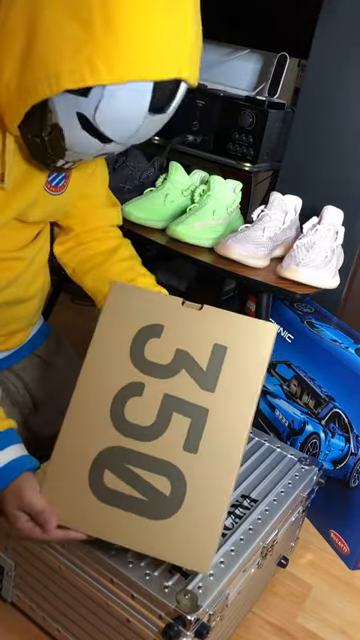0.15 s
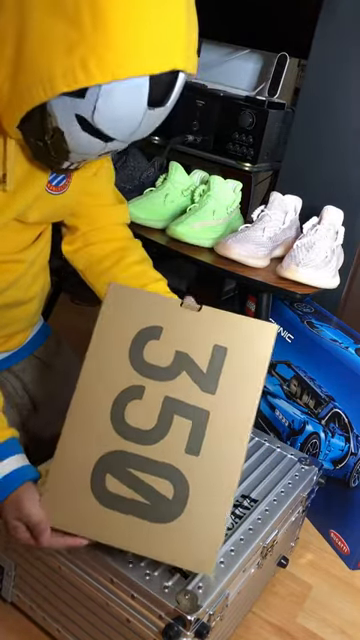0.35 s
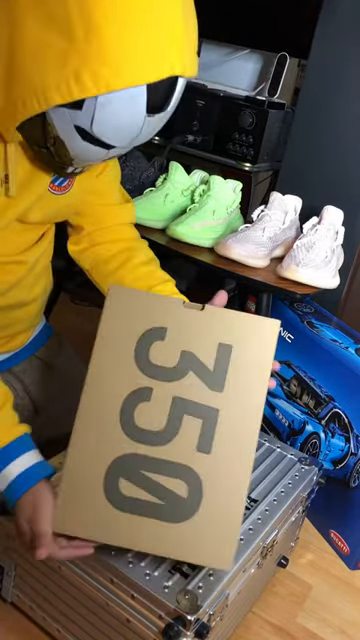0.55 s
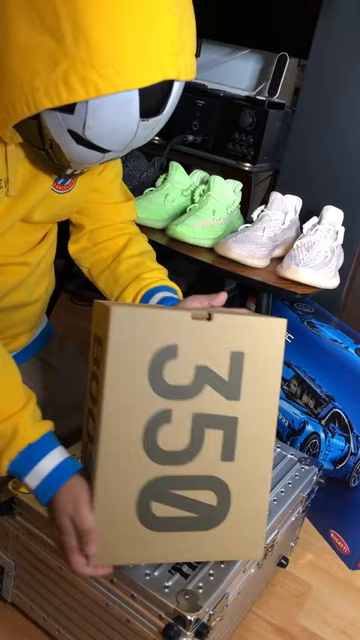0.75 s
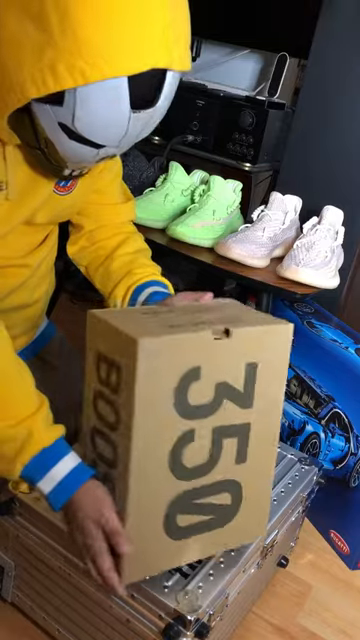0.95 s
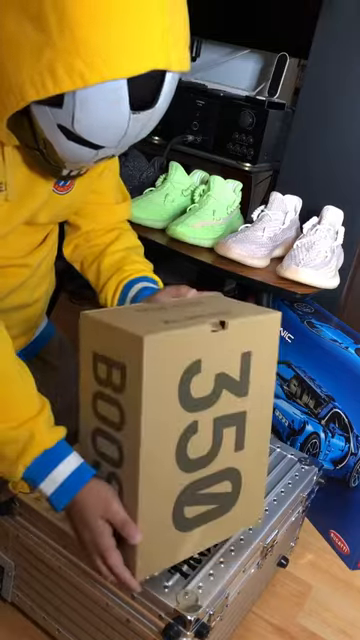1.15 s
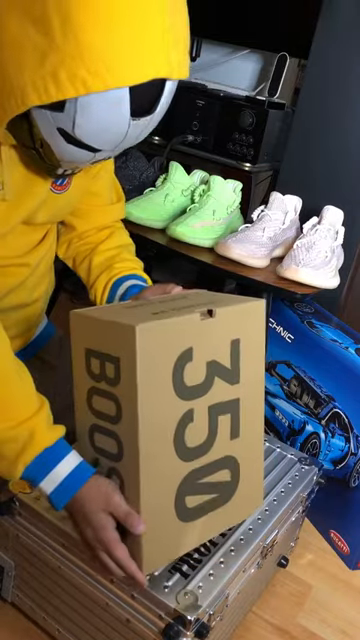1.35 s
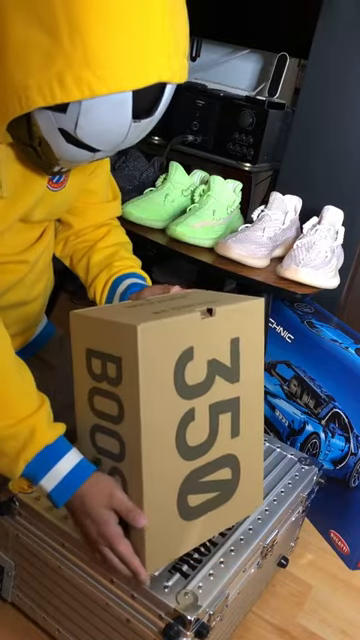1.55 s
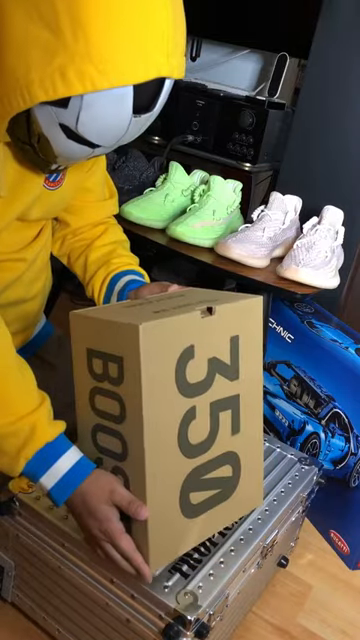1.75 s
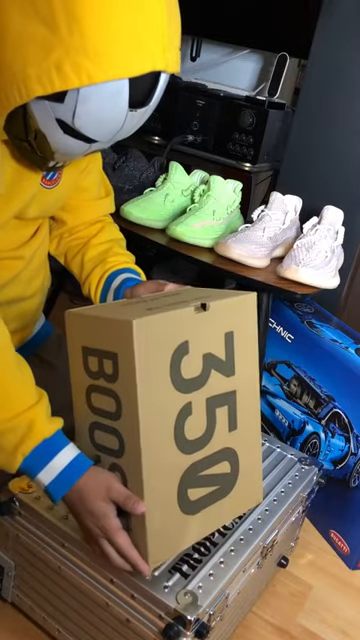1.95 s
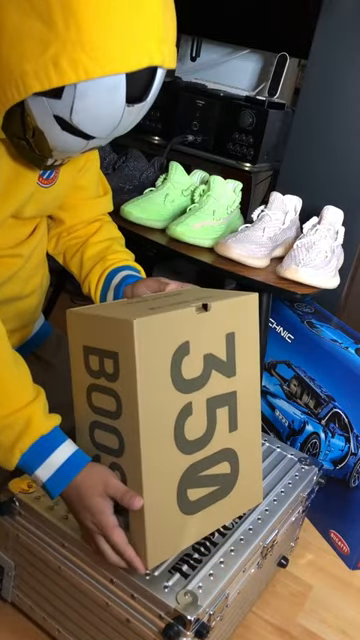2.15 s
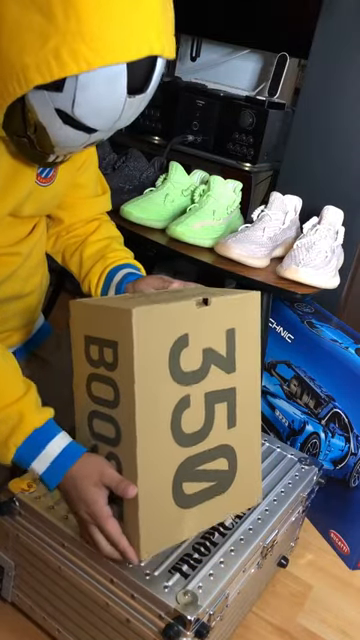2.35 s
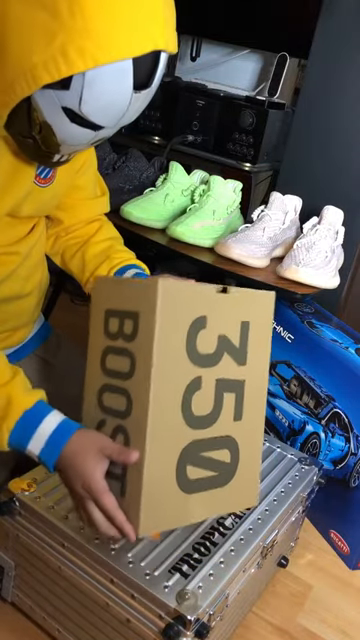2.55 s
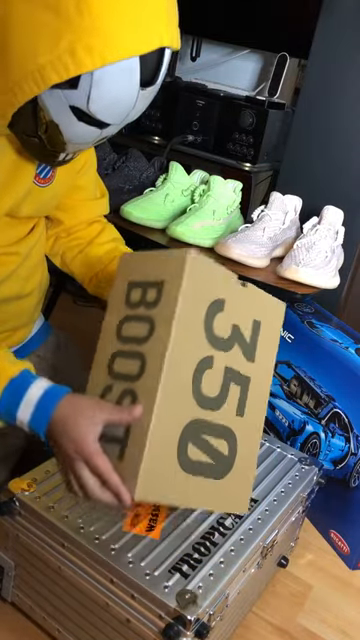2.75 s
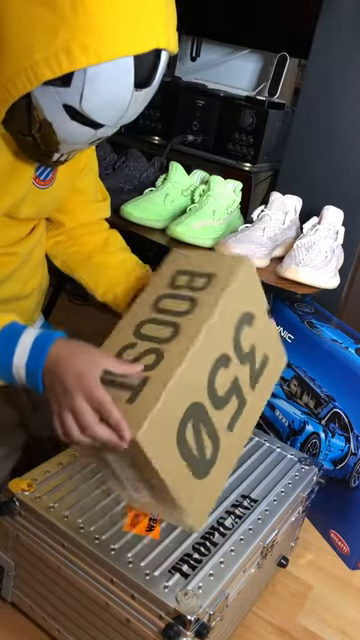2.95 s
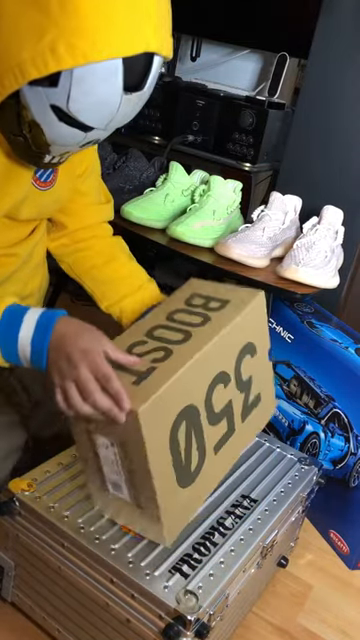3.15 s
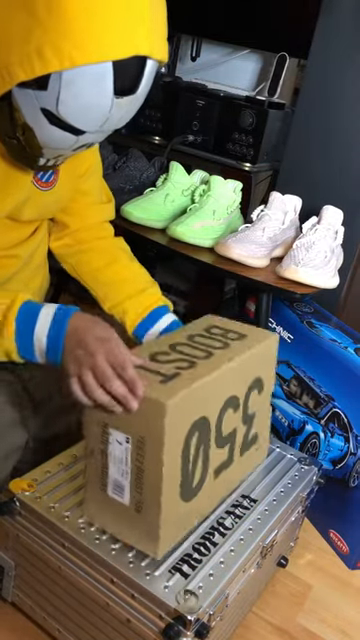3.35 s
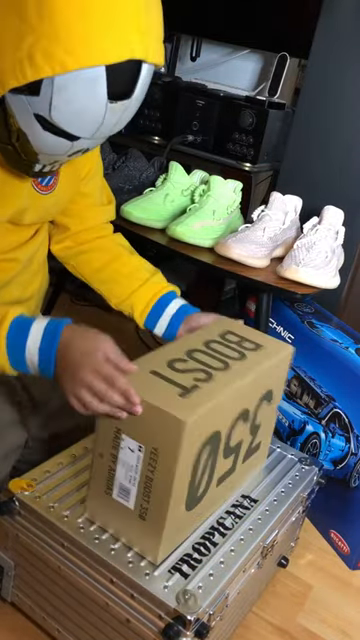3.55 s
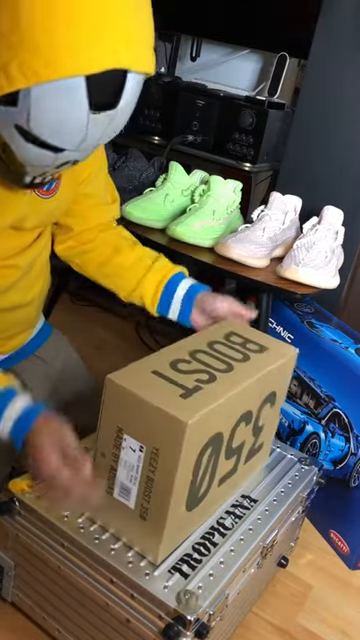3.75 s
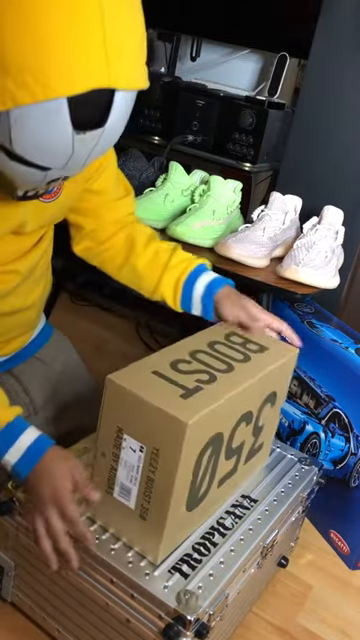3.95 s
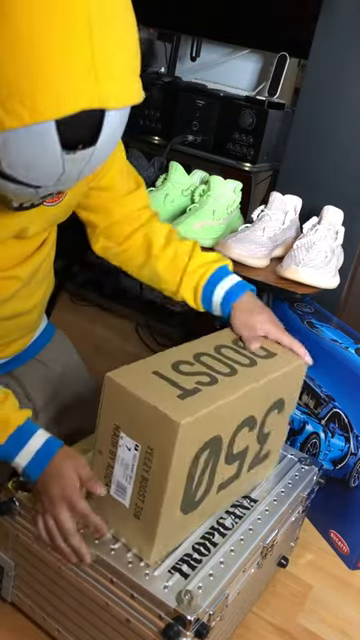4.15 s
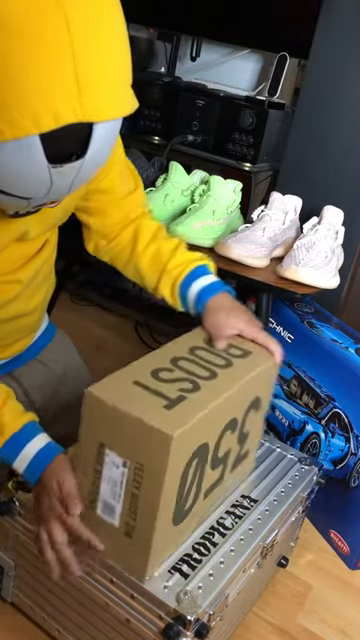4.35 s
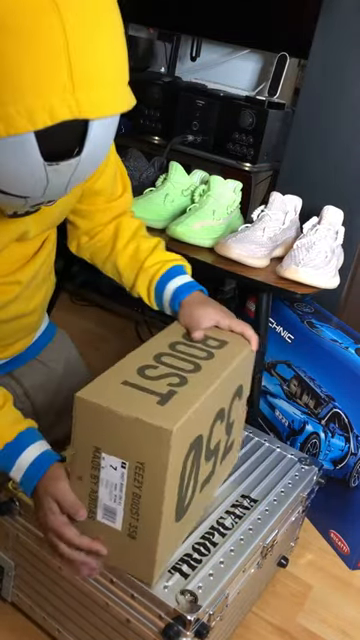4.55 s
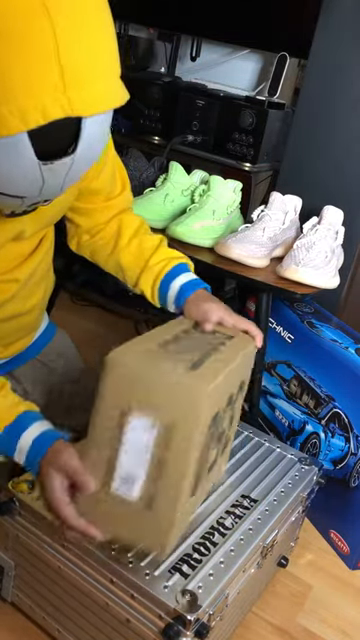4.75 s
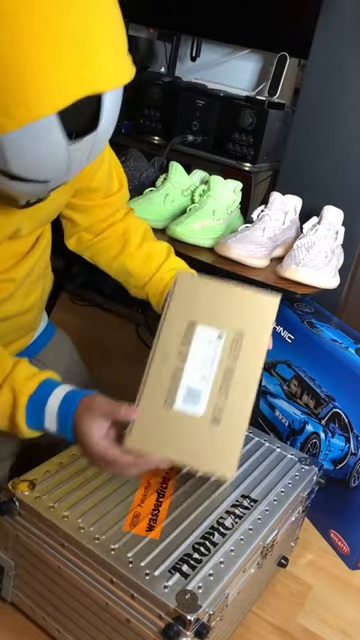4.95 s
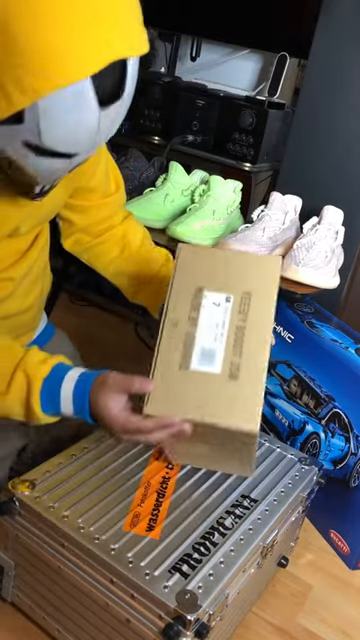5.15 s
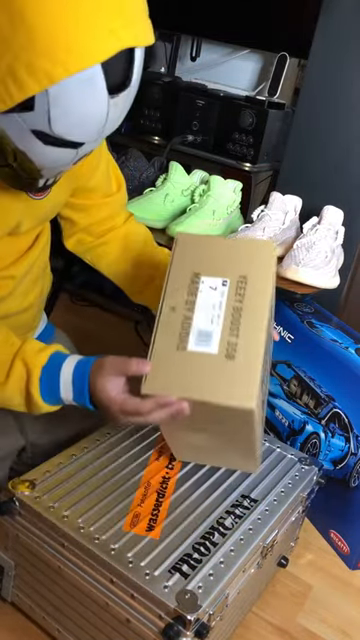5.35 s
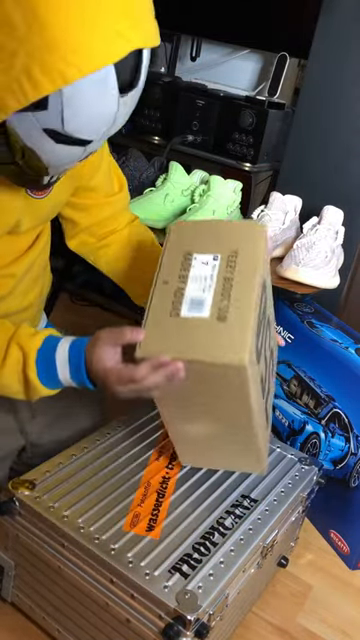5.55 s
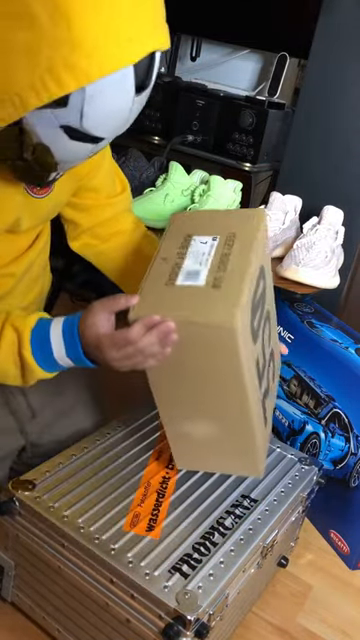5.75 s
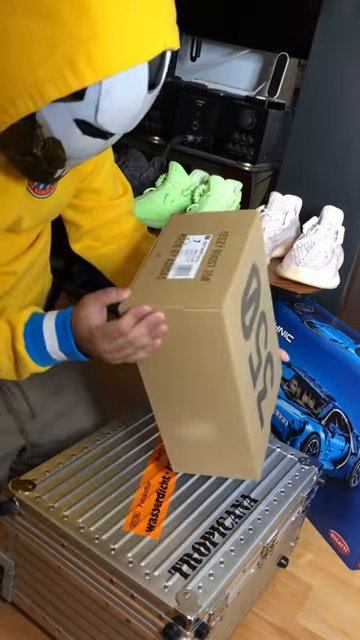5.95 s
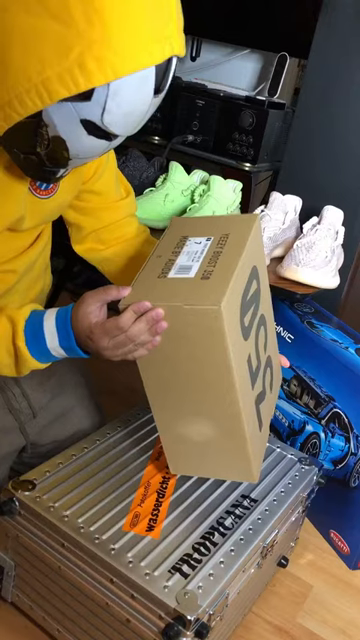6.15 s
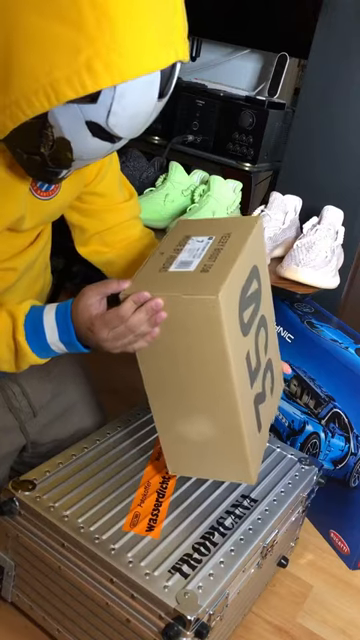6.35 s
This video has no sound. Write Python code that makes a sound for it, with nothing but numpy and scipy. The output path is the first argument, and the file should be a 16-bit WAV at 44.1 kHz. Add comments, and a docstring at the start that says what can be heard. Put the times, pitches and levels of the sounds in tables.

```python
"""Small quiet room: a cardboard box is turned in the hands over a metal case.
Palms and sleeves slide on the card: shaped grain noise makes hiss, rasp, scrape and panel rumble.
Edges knock on the case: decaying sines ring the box modes, with a noise burst at the contact.
The card ticks: short filtered noise bursts. A faint sine hum wavers over still air (shaped noise)."""
import sys
import numpy as np
from scipy import signal
from scipy.fft import rfft, irfft
from scipy.io import wavfile
from scipy.ndimage import uniform_filter1d, map_coordinates

SR = 44100
rng = np.random.default_rng(int(sys.argv[2]) if len(sys.argv) > 2 else 0)


def file_out(sig):
    """Save sig as 16-bit WAV at sys.argv[1]."""
    # one column per channel
    cols = np.atleast_2d(sig).T
    # limit, then scale
    lim = np.clip(cols, -1, 1)
    pcm = np.round(lim * 32767).astype(np.int16)
    wavfile.write(sys.argv[1], SR, pcm)


N = 286209  # samples

# rubs of a hand over the card: start_s (full contact), rise_s_per_10db, hold_s, fall_s_per_10db,
# hiss_db, rasp_db, scrape_db, rumble_db
RUBS = [(0, .1, 0.02, 0.3, -73, -68.5, -67.5, -65.5), (0.258, .09, 0.0069, 0.0442, -53.5, -56.5, -57, -65),
        (0.556, 0.27, 0.1, -0.01, -58, -59.5, -67.5, -91),
        (0.718, 0.11, 0.072, 0.0842, -54.5, -61, -70, -74),
        (0.849, 0.31, 0.097, 0.06, -59.5, -60.5, -64, -54.5),
        (1.097, 0.4, 0.01, 0.12, -81, -70.5, -66, -74), (1.215, -0.02, .03, 0.12, -77, -67, -64, -66),
        (1.274, .04, 0.026, 0.03, -79, -60.5, -62, -78), (1.368, 0.4, 0.056, -0.03, -76, -76, -71, -80),
        (1.475, -0.07, 0.036, 0.14, -70, -79, -70, -70), (1.539, 0.11, 0.026, 0.05, -69, -63.5, -67.5, -68),
        (1.919, 0.1, 0.028, 0.12, -71, -73.5, -75.5, -72), (2.205, 0.2, .005, 0.3, -77, -75, -73, -74),
        (2.393, 0.03, 0.0045, 0.05, -68, -68.5, -77, -69), (2.714, 0.14, .05, 0.1, -59, -64, -66, -68.5),
        (2.857, 0.04, 0.099, .05, -65, -66.5, -65, -75.5),
        (2.974, .02, 0.028, 0.1247, -54.5, -55.5, -53, -49.5),
        (3.161, 0.12, 0.13, 0.15, -53.5, -60.5, -59, -61.5),
        (3.367, 0.03, 0.025, 0.24, -70, -62, -56.5, -58),
        (3.587, 0.13, 0.027, 0.055, -52, -55.5, -55, -53.5),
        (3.89, -0.26, 0.0055, 0.33, -61.5, -65, -66.5, -71.5),
        (3.989, 0.06, .005, .25, -56, -58, -59, -55.5), (4.168, 0.0347, 0.1, 0.09, -53, -60, -60, -69),
        (4.294, 0.0745, 0.096, 0, -56.5, -57.5, -64, -59),
        (4.442, 0.0932, .005, 0.11, -51, -50, -49.5, -55),
        (4.716, 0.22, 0.0056, 0.1024, -51.5, -53, -51.5, -55),
        (4.919, 0, 0.0088, 0, -64.5, -63.5, -68, -76), (5.186, 0.3, 0.02, 0.1, -73.5, -71, -69.5, -71.5),
        (5.398, 0.05, .005, 0.12, -63.5, -64.5, -74, -74), (5.504, .1, 0.018, 0.15, -61, -63, -63, -70.5),
        (5.674, 0.0855, .005, 0.08, -54.5, -54.5, -53.5, -65),
        (5.718, -0.07, 0.015, 0.07, -77, -61.5, -58.5, -64),
        (5.838, -0.1, 0.022, 0.07, -68.5, -64.5, -65.5, -73),
        (6.021, -0.5, 0.0047, -0.6, -76.5, -79.5, -67, -67),
        (6.14, 0.4, 0.0052, 0.4, -77, -76.5, -74.5, -69.5),
        (6.277, 0.06, 0.0053, .07, -73.5, -70, -62, -65), (6.473, -2.1, 0.033, .05, -79, -80, -78, -71)]
# hands that merely hold the box: hiss_db, rasp_db, scrape_db, rumble_db
GRIP_DB = [-87.5, -93.5, -78, -76.5]
# spectra of the rub layers: freq_hz, level_db (per Hz)
HISS_SPECTRUM = [(1500, -15.5), (3500, -8), (5000, -6.5), (8000, -8), (12500, -13.5), (16000, -17)]
RASP_SPECTRUM = [(900, -19), (1500, -4.5), (2300, -1), (3500, -3), (6000, -10), (16000, -47)]
SCRAPE_SPECTRUM = [(200, -26), (330, 1.5), (450, 2), (640, 2.5), (1000, 0), (1400, -5), (2400, -26),
                   (16000, -67.5)]

# box modes, panels and inner air < 320 Hz, walls < 1200 Hz, stiff edges above: freq_hz
MODE_HZ = [50, 85, 110, 145, 179, 237, 269, 350, 400, 480, 590, 700, 862, 981, 1340, 1650, 1870, 2230, 2515,
           2850, 3170, 3650, 4200, 4870, 6140, 7800, 11000]
# the same modes ringing freely: strength_db, t60_s
MODE_RING = [(-3.5, .26), (-4.5, .33), (-2.5, 0.38), (-7, .2), (1, .23), (-3, .16), (-2.5, 0.12), (-2, .09),
             (-4.5, .09), (-8, 0.021), (-4.5, 0.046), (-9.5, .035), (-9, .035), (2.5, .028), (-6, 0.012),
             (-2, .011), (-1, .007), (0, 0.0051), (-3.5, .008), (-3, 0.0055), (-4, 0.0053), (-10, .005),
             (-11, 0.0051), (-8, .007), (-9.5, 0.0077), (-20.5, .005), (-23.5, .005)]
# knocks and bumps: start_s, crack_peak_db, crack_centre_hz, knock_peak_db, knock_centre_hz,
# boom_peak_db, boom_centre_hz, panel_spread_octaves
KNOCKS = [(.714, -46, 2000, -46.5, 724, -45, 166, 0.77), (.844, -46, 2000, -51, 479, -43.5, 160, 0.63),
          (.914, -50, 2000, -53, 530, -45.5, 180, .72), (.939, -67, 2000, -55, 439, -42.5, 158, 0.2),
          (2.746, -46, 2000, -54, 598, -45.5, 157, .42), (2.974, -51, 3000, -58, 600, -41, 150, 1.3),
          (3.2606, -4.5, 1840, -17.5, 904, -18, 182, 1.6), (3.503, -27.5, 2320, -35, 610, -36.5, 176, 1.3),
          (3.507, -30.5, 2980, -39, 800, -45, 174, 1.2), (3.978, -47, 2000, -53, 530, -41, 159, 0.58),
          (4.298, -34, 4500, -44, 590, -41, 182, 0.68), (4.41, -38, 2000, -58, 589, -43.5, 148, 0.51),
          (4.5, -53, 2000, -43.5, 407, -42, 173, 0.88), (4.588, -47, 4200, -35.5, 660, -41.5, 250, 0.96),
          (4.625, -38.5, 4000, -37, 615, -43, 200, 1.2), (4.665, -42, 2000, -53, 700, -43.5, 178, .81),
          (5.062, -50.5, 2200, -54, 740, -70.5, 202, 0.29), (5.194, -50, 3000, -46.5, 512, -61, 222, 0.29),
          (5.684, -22, 1300, -26, 636, -44.5, 262, 0.73), (5.706, -44, 1604, -39, 550, -39.5, 247, 0.34),
          (5.912, -61.5, 2700, -54.5, 600, -69, 200, .4)]
# ticks of the card: start_s, peak_db, centre_hz
TICKS = [(2.1988, -53, 2960), (2.8904, -61, 4550), (3.754, -55, 4280), (3.834, -61, 5690),
         (3.884, -49, 3970), (3.939, -44, 4860), (4.063, -37.5, 2590), (4.2708, -35, 2420),
         (4.2979, -36.5, 5070), (5.1612, -52.5, 4520), (5.5058, -47, 2720), (5.541, -45, 4390),
         (5.6, -48, 4130), (5.8401, -50, 8000), (5.857, -53, 4560), (5.9515, -52, 5030), (6.131, -49, 5390),
         (6.2164, -50.5, 2860), (6.2583, -48, 6700), (6.281, -56, 8000), (6.288, -50, 4970),
         (6.311, -52, 2600), (6.366, -56, 3200)]
# swells of the hum: start_s, hold_s, level_db
HUM_SWELLS = [(0, .7, -72), (1.97, .1, -73), (2.11, 0.33, -68.5), (2.725, 0.16, -66), (4.84, 0.094, -72),
              (6.265, 0.14, -72)]
# spectrum of the still air: freq_hz, level_db (per Hz)
AIR_SPECTRUM = [(15, -67), (25, -31), (74, -8.5), (170, -19), (277, -14.5), (326, -28.5), (373, -8),
                (427, -27), (936, -20.5), (1100, -26.5), (16000, -47)]
# decay of the room: freq_hz, t60_s
ROOM_DECAY = [(150, 0.2), (600, 0.42), (2000, 0.35), (6000, .25), (14000, 0.13)]

PANEL_TOP_HZ, WALL_TOP_HZ = 320, 1200
LAG_MS_AT_200HZ = 4.0  # bending waves carry the bass slower than the treble
EDGE_LAG_MS_AT_2KHZ = 0.5  # stiff edges start almost together
EDGE_SPREAD_OCTAVES = 1.42  # spread of a blow over the edge modes
HELD_SHARE, FREE_BOOM_DB = 0.45, -19  # hands shorten the ring towards this share; such a boom rings freely
SPLINTER_DB, SPLINTER_MS = -12, 1.5  # contact noise re crack; decay constant
RATTLE_DB, RATTLE_T60_S = -31.5, 0.27  # loose contents rustle on, re crack
TICK_MS = 3.9  # decay constant
CREAK_SPAN_S, CREAK_DB, CREAK_SPAN_HZ = (5.5, 6.4), -60, (3000, 11000)  # faint random ticks
HUM_HZ, HUM_FAINT_DB = 377, -87  # mean pitch; level between swells
HUM_RISE_S_PER_10DB, HUM_FALL_S_PER_10DB = 0.017, 0.08
AIR_DB = -71.5
ROOM_DB, ROOM_GAP_MS = -11, 7  # echo level; time the first reflections take to gather
TOP_HZ = 15800


def undb(db):
    """Amplitude from dB."""
    return 10 ** (np.asarray(db) / 20)


def unit(x):
    """Scale to RMS 1."""
    return x / np.sqrt(np.mean(x ** 2))


def curve(time_s, values):
    """Straight lines between breakpoints, one value per sample."""
    return np.interp(np.arange(N) / SR, time_s, values)


def colour(x, points):
    """Shape x by (freq_hz, level_db) points on a log frequency axis."""
    hz, db = np.transpose(points)
    f = np.arange(len(x) // 2 + 1) * SR / len(x) + 1
    gain = undb(np.interp(np.log(f), np.log(hz), db))
    return irfft(rfft(x) * gain, len(x))


def band(x, hz, width_hz):
    """One resonance."""
    b, a = signal.iirpeak(min(hz, 0.4 * SR), hz / width_hz, fs=SR)
    return signal.lfilter(b, a, x)


def walk(rate_hz):
    """Random levels, one per 1 / rate_hz s, joined by slews."""
    step = int(SR / rate_hz)
    held = np.repeat(rng.standard_normal(N // step + 1), step)
    return uniform_filter1d(held, step)[:N]


def add(out, start_s, x):
    """Mix x into out from start_s."""
    i = int(start_s * SR)
    out[i:i + len(x)] += x[:N - i]


def swells(start_s, rise_s, hold_s, fall_s, db, rest_db):
    """Gain of overlapping rise-hold-fall shapes (s per 10 dB) over a rest level; powers add."""
    t = np.arange(0, N / SR + 0.01, 0.002)[:, None]
    before = np.maximum(start_s - t, 0) / np.maximum(rise_s, 0.005)
    after = np.maximum(t - start_s - hold_s, 0) / np.maximum(fall_s, 0.005)
    power = (undb(db - 10 * (before + after)) ** 2).sum(1)
    return curve(t[:, 0], np.sqrt(power + undb(rest_db) ** 2))


def grains(spread_db, patchy_db, rate_hz):
    """Fibres catch and let go: dense clicks of uneven size, in patches."""
    size = undb(spread_db * rng.exponential(size=N) + patchy_db * walk(rate_hz))
    return unit(rng.standard_normal(N) * size)


def mottle(x, depth_db):
    """The colour of a rub shifts as the contact moves: patches of pitch and time swell and sink."""
    hz, time_s, spectrum = signal.stft(x, SR, nperseg=1024)
    # grid steps: a third octave (wider in the bass) by about 80 ms
    place = np.meshgrid(3 * np.log2(1 + hz / 300), time_s * 12, indexing="ij")
    patches = map_coordinates(rng.standard_normal((40, 120)), place, order=1)
    return signal.istft(spectrum * undb(depth_db * patches), SR)[1][:N]


def sliding():
    """Skin and cloth hiss on the card; the drag also rasps and scrapes its surface and shakes the panels."""
    start_s, rise_s, hold_s, fall_s, *levels_db = np.transpose(RUBS)
    catch = undb(1.2 * walk(45))  # every layer feels the hand catch and slip
    hiss = colour(mottle(grains(spread_db=2.5, patchy_db=0.0, rate_hz=60), depth_db=2.5), HISS_SPECTRUM)
    drag = mottle(grains(spread_db=1.5, patchy_db=1.0, rate_hz=45), depth_db=3.0)
    rasp = colour(drag, RASP_SPECTRUM)
    scrape = colour(drag, SCRAPE_SPECTRUM)
    shake = band(grains(spread_db=1.0, patchy_db=0.0, rate_hz=44), 165, 130)
    rumble = sum(undb(db) * band(shake, hz, 60.0)
                 for hz, (db, _) in zip(MODE_HZ, MODE_RING) if hz < PANEL_TOP_HZ)
    out = np.zeros(N)
    for layer, db, rest_db in zip((hiss, rasp, scrape, rumble), levels_db, GRIP_DB):
        out += unit(layer) * swells(start_s, rise_s, hold_s, fall_s, db, rest_db)
    return catch * out


def knocks():
    """Each blow rings the box modes, treble first; its place sets the share of every mode."""
    out, t = np.zeros(N), np.arange(int(0.6 * SR)) / SR
    hz = np.array(MODE_HZ)[:, None]
    strength_db, t60_s = np.transpose(MODE_RING)[:, :, None]
    part = np.digitize(hz[:, 0], [PANEL_TOP_HZ, WALL_TOP_HZ])  # 0 panels, 1 walls, 2 edges
    sign = (-1.) ** np.arange(len(hz))[:, None]  # neighbouring modes swing opposite ways
    body_lag_ms = LAG_MS_AT_200HZ * (200 / hz) ** 0.8
    edge_lag_ms = EDGE_LAG_MS_AT_2KHZ * (2000 / hz) ** 0.15
    lag_ms = np.where(hz < WALL_TOP_HZ, body_lag_ms, edge_lag_ms)
    age_s = np.maximum(t - lag_ms / 1000, 0)
    rise = 1 - np.exp(-age_s * hz / 0.45)  # a mode takes part of a cycle to build up
    splinter = undb(SPLINTER_DB) * np.exp(-t * 1000 / SPLINTER_MS)
    rattle = undb(RATTLE_DB - 60 * t / RATTLE_T60_S)

    for row in KNOCKS:
        start_s, crack_db, crack_hz, knock_db, knock_hz, boom_db, boom_hz, spread = row
        share, detune = rng.standard_normal((2, len(hz), 1))
        centre_hz = np.array([boom_hz, knock_hz, crack_hz])[part][:, None]
        octaves = np.maximum([spread, 0.62 * spread, EDGE_SPREAD_OCTAVES], 0.2)[part][:, None]
        focus_db = -6 * (np.log2(hz / centre_hz) / octaves) ** 2
        free = min(HELD_SHARE + (1 - HELD_SHARE) * undb(boom_db - FREE_BOOM_DB), 1)
        damping = np.where(part[:, None] < 2, free, 1)  # edges always ring freely
        fade_db = -60 * age_s / (t60_s * damping)
        level = undb(strength_db + focus_db + 1.3 * share + fade_db)
        ring = sign * rise * level * np.sin(2 * np.pi * hz * (1 + 0.0069 * detune) * age_s)
        for k, peak_db in enumerate((boom_db, knock_db, crack_db)):
            sound = ring[part == k].sum(0)
            add(out, start_s, undb(peak_db) * sound / np.abs(sound).max())
        grit = rng.standard_normal(len(t)) * (splinter + rattle)
        add(out, start_s + 0.0008, undb(crack_db) * band(grit, 2800, 4270))
    return out


def ticks():
    """Short dry noise bursts as creases in the card give way, some at random moments."""
    out, t = np.zeros(N), np.arange(int(0.04 * SR)) / SR
    creaks = []
    for a, b, c in rng.random(size=(12, 3)):
        start_s = CREAK_SPAN_S[0] + a * (CREAK_SPAN_S[1] - CREAK_SPAN_S[0])
        hz = CREAK_SPAN_HZ[0] + c * (CREAK_SPAN_HZ[1] - CREAK_SPAN_HZ[0])
        creaks.append((start_s, CREAK_DB + 6 * (b - 0.5), hz))
    for start_s, db, hz in list(TICKS) + creaks:
        burst = band(rng.standard_normal(len(t)) * np.exp(-t * 1000 / TICK_MS), hz, 0.72 * hz)
        add(out, start_s, undb(db) * burst / np.abs(burst).max())
    return out


def room(x):
    """Diffuse reflections: octave bands of noise, each dying at its own rate."""
    t = np.arange(int(0.8 * SR)) / SR
    hz, t60_s = np.transpose(ROOM_DECAY)
    tail = np.zeros(len(t))
    for f in 60 * 2. ** np.arange(9):
        noise = unit(band(rng.standard_normal(len(t)), f, 0.54 * f))
        fade_db = -60 * t / np.interp(np.log(f), np.log(hz), t60_s)
        tail += noise * np.sqrt(f) * undb(fade_db)
    tail *= np.clip(t * 1000 / ROOM_GAP_MS, 0, 1) ** 2
    tail /= np.sqrt(np.sum(tail ** 2))
    return undb(ROOM_DB) * signal.fftconvolve(x, tail)[:N]


def hum():
    """A thin sine, wavering in pitch and level, that swells and fades."""
    start_s, hold_s, db = np.transpose(HUM_SWELLS)
    phase = 2 * np.pi * np.cumsum(HUM_HZ * (1 + 0.0039 * walk(3.6))) / SR
    level = swells(start_s, HUM_RISE_S_PER_10DB, hold_s, HUM_FALL_S_PER_10DB, db, HUM_FAINT_DB)
    return np.sqrt(2) * level * undb(1.5 * walk(14)) * np.sin(phase)


def still_air():
    """Steady shaped noise."""
    return unit(colour(rng.standard_normal(N), AIR_SPECTRUM)) * undb(AIR_DB)


def scene():
    """Knocks and ticks with their echo, the rubs, hum and still air."""
    hits = knocks() + ticks()
    return (sliding() + hits + room(hits) + hum() + still_air())[None]


def record(dry):
    """The microphone loses the deepest bass; the top is cut."""
    high_pass = signal.butter(4, 42, "high", fs=SR, output="sos")
    low_pass = signal.ellip(10, 0.2, 60, TOP_HZ, fs=SR, output="sos")
    return signal.sosfilt(low_pass, signal.sosfilt(high_pass, dry))


dry = scene()
out = record(dry)
file_out(out)
```